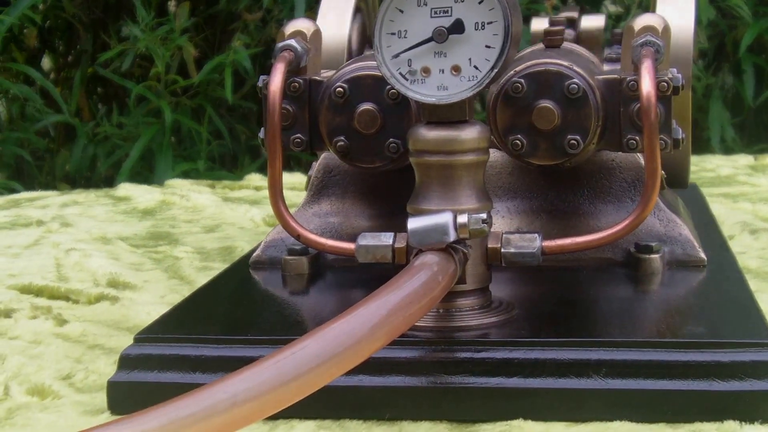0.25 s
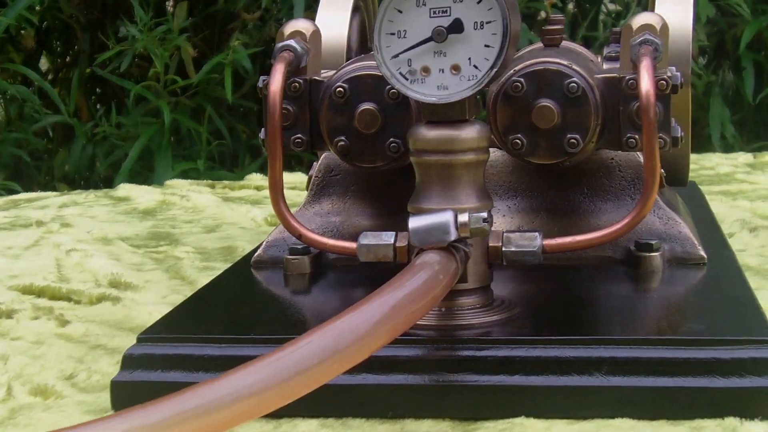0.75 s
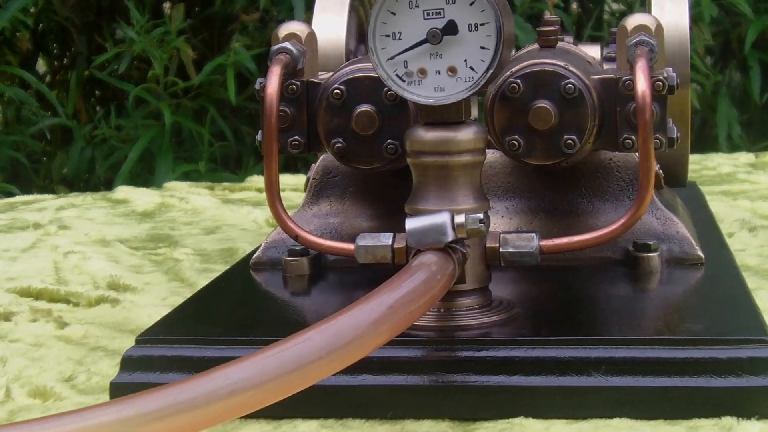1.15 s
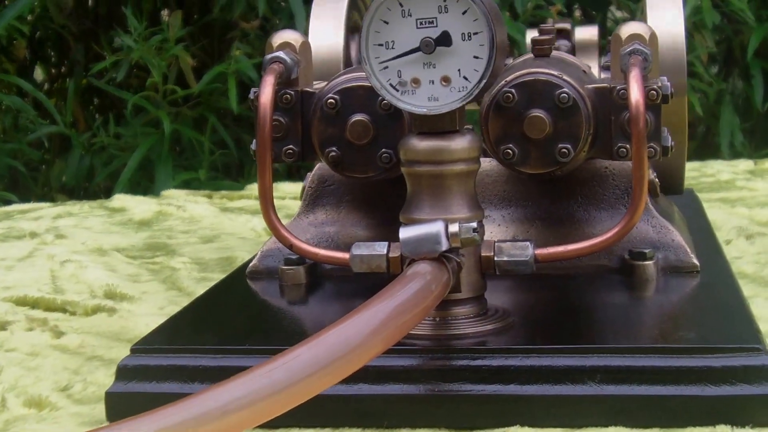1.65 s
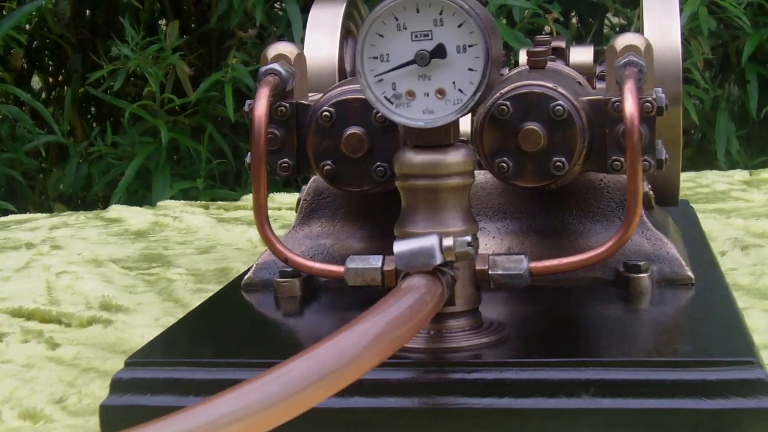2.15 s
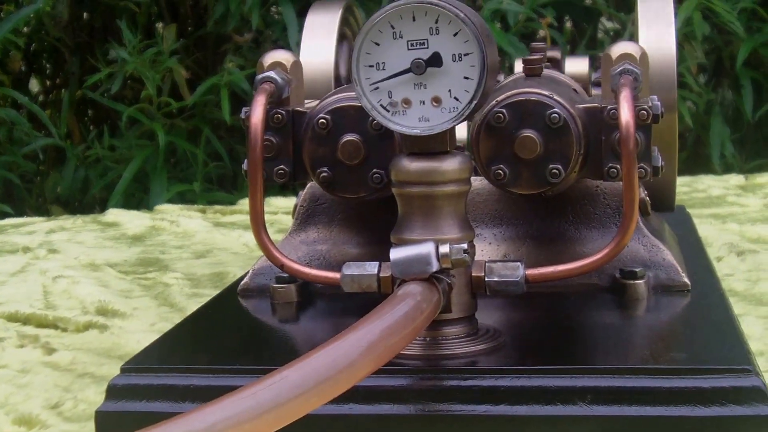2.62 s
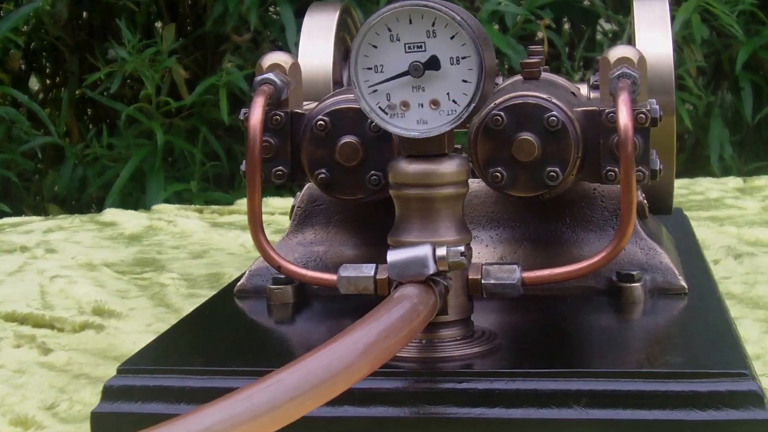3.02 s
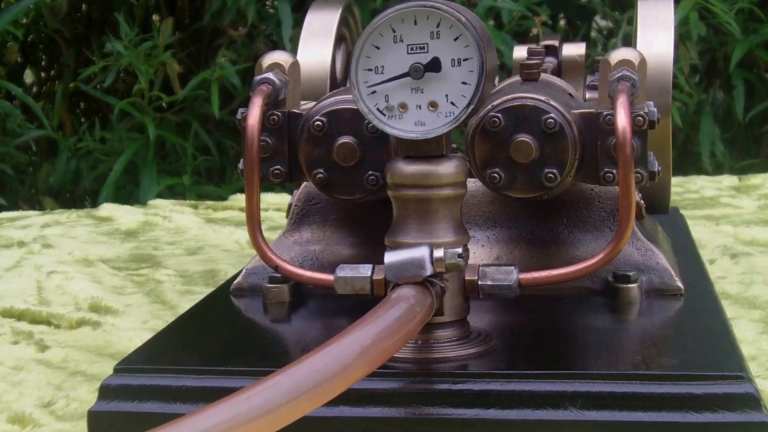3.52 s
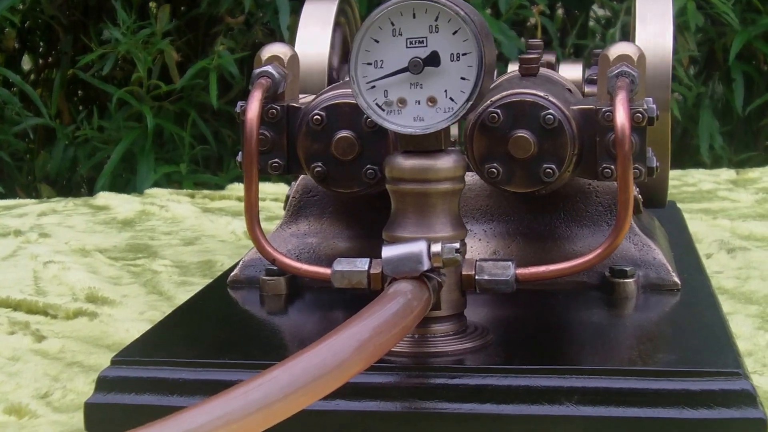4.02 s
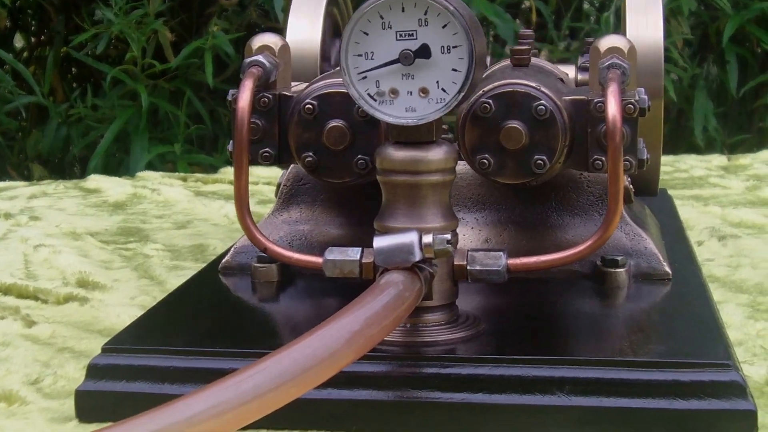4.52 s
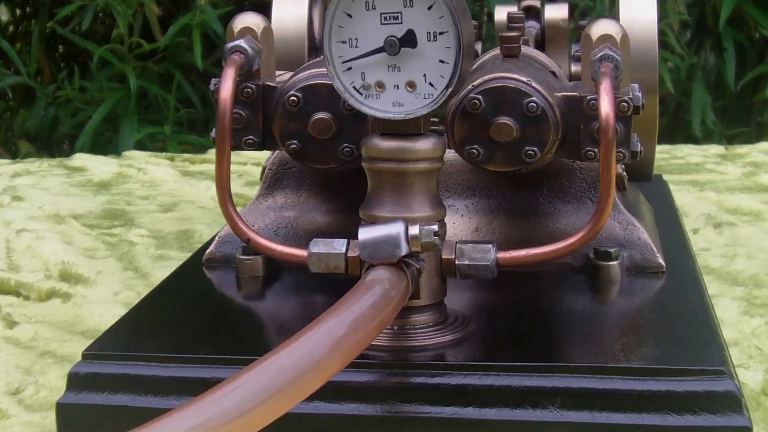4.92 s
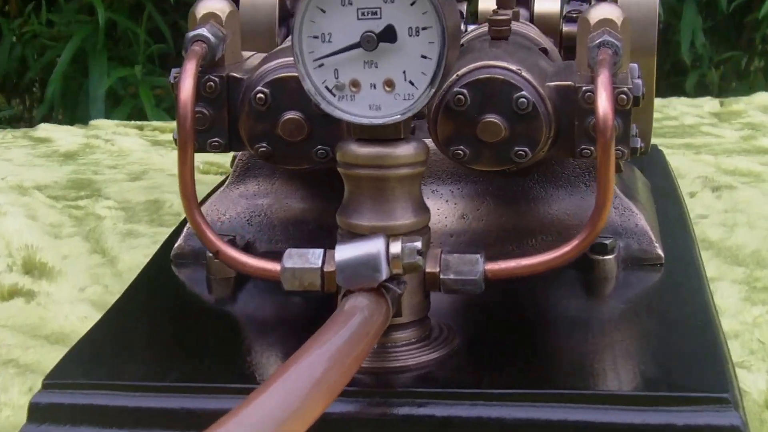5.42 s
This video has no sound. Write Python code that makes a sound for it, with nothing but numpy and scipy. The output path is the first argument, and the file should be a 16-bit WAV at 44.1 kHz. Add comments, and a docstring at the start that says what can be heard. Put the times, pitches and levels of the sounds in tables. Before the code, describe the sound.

A small twin-cylinder model steam engine is heard very close, dry and centred, already running at the start. From 0 to 1.4 seconds it makes about 4.7 turns a second, each turn carrying three short, slightly different metallic knocks with a brief scrape and quickly fading ring. Bright airy steam hiss runs throughout, swelling gently in five uneven puffs per turn, so it flutters. Gritty sliding friction fills the midrange and makes the casting ring. Around 1.44 seconds the throttle opens: the steam rush jumps up and the beat accelerates sharply, nearing 6.4 turns a second by 2.2 seconds. The extra surge eases near 1.85 seconds. From there to about 5.7 seconds the rapid clatter stays regular, while the steam rush creeps slightly louder. A faint pump buzz, mostly around 600 to 1100 hertz, holds a steady pitch over barely audible low tones. It ends still running.

```python
"""Small steam engine speeding up

A small twin-cylinder model steam engine runs close by; its throttle opens near 1.44 s and it speeds up.
Three loose joints each knock once per turn: a brief scrape and a burst of fading sine waves.
Steam is shaped noise that hisses throughout and swells in five exhaust puffs per turn.
Sliding parts add grainy friction noise and set the casting ringing with it.
A small pump buzzes at its own nearly steady speed, as a stack of sine waves, over two faint low tones."""
import sys
import numpy as np
from scipy.fft import rfft, irfft, next_fast_len
from scipy.io import wavfile
from scipy.ndimage import map_coordinates

SR = 44100
rng = np.random.default_rng(int(sys.argv[2]) if len(sys.argv) > 2 else 0)


def store_wav(level_fs):
    """Save 16-bit WAV to argv[1]."""
    pcm = np.round(np.clip(np.atleast_2d(level_fs), -1, 1) * 32767)
    wavfile.write(sys.argv[1], SR, pcm.T.astype(np.int16))


N = 250045
TIME = np.arange(N) / SR  # seconds


def amp(db):
    """Turn decibels into a plain multiplier."""
    return 10 ** (np.asarray(db) / 20)


def unit(x):
    """Scale x to an rms level of 1."""
    return x / np.sqrt(np.mean(x ** 2) + 1e-20)


def wobble(rate):
    """A smooth random curve through `rate` random points per second."""
    points = rng.standard_normal(int(N * rate / SR) + 4)
    return map_coordinates(points, [np.arange(N) * rate / SR])


def filtered(x, response):
    """Multiply each frequency in x by response(frequency in Hz)."""
    size = next_fast_len(N + SR // 4)  # spare room keeps the end from wrapping onto the start
    spectrum = rfft(x, size) * response(np.fft.rfftfreq(size, 1 / SR))
    return irfft(spectrum, size)[:N]


def coloured_noise(spectrum):
    """White noise given a tone colour, at rms 1."""
    return coloured(rng.standard_normal(N), spectrum)


def coloured(x, spectrum):
    """Shape x along a line through (f/Hz, level/dB) points, at rms 1."""
    f, db = np.transpose(spectrum)
    return unit(filtered(x, lambda hz: amp(np.interp(np.log(hz + 1), np.log(f), db))))


def shaft():
    """The shaft gathers speed as steam is let in: turns made so far, and drive from 0 (slow) to 1 (fast)."""
    # shaft speed over time: t/s, speed/(turns per s)
    speed_points = [(0, 4.6867), (1.461, 4.6577), (1.531, 5.6587), (1.765, 6.2601), (2.255, 6.4468),
                    (3, 6.4564), (5.67, 6.4135)]
    slow, fast = 4.67, 6.44  # turns per second
    times, speeds = np.transpose(speed_points)
    speed = np.interp(TIME, times, speeds)
    turns = np.cumsum(speed) / SR
    drive = np.clip((speed - slow) / (fast - slow), 0, 1)
    return turns, drive


def once_per_turn(turns, drive, place, slow_db, fast_db, uneven_db):
    """A joint takes up its play at one place in each turn: rows of t/s, force/dB, with a little chance."""
    # place holds the part of a turn (0-1) at low and at high speed
    passes = np.floor(turns - np.interp(drive, [0, 1], place))
    at = np.flatnonzero(np.diff(passes) > 0)
    force_db = slow_db + drive[at] * (fast_db - slow_db) + uneven_db * rng.standard_normal(len(at))
    return np.column_stack([at / SR, force_db])


def joint(knocks, modes, drive, gain_db, rise_s, scrape_db, scrape_s):
    """An oiled joint closes softly, scrapes for a moment and rings much alike on every turn."""
    # colour of metal rubbing on oiled metal: f/Hz, relative level/dB per Hz
    scrape_colour = [(300, -31), (750, -1), (1000, 2), (1550, -2), (2300, 3), (2900, -5), (4000, -5.5),
                     (7000, -15), (14000, -36)]
    alike = 0.82  # share of the scrape's power that repeats on every turn
    scatter_db, detune = 0.2, 0.003  # chance spread of each mode's level, and of its pitch as a fraction
    low_hz = 620
    hz, t60, slow_db, fast_db = np.transpose(modes)[:, :, None]

    lead = SR // 100  # samples before contact
    t = np.arange(-lead, SR // 16) / SR
    age = np.maximum(t, 0)
    start_phase = rng.uniform(0, 2 * np.pi, hz.shape)
    # heavy low modes take longer to build up than light high ones
    mode_rise = rise_s * (hz.mean() / hz) ** 0.22
    swell = 1 - np.exp(-(age / mode_rise) ** 2)
    # the surfaces rub just before and after they meet
    contact = 1 / np.cosh(np.clip((t - .001) / scrape_s, -20, 20))
    rubbing = coloured_noise(scrape_colour)
    grain, *fresh_grains = rubbing[:N - N % len(t)].reshape(-1, len(t))

    out = np.zeros(N + SR)
    for (seconds, force_db), fresh in zip(knocks, fresh_grains):
        at = max(round(seconds * SR), 0)
        size, pitch, slip = rng.standard_normal((3, *hz.shape))
        level_db = slow_db + drive[at] * (fast_db - slow_db) + scatter_db * size
        fade = amp(level_db - 60 * age / t60)
        phase = 2 * np.pi * hz * (1 + detune * pitch) * age + start_phase + slip / 2
        ring = (swell * fade * np.sin(phase)).sum(0)
        # the same worn spot passes on every turn, pressed harder at speed
        rub = np.sqrt(alike) * grain + np.sqrt(1 - alike) * fresh
        scrape = amp(scrape_db + 3.1 * drive[at]) * contact * rub
        out[at:at + len(t)] += amp(force_db) * (amp(gain_db) * ring + scrape)
    # such small parts radiate almost no bass
    return filtered(out[lead:lead + N], lambda f: f ** 6 / (f ** 6 + low_hz ** 6))


def joints(turns, drive):
    """Crosshead, crank and bearing each knock at their own place, a little later in the turn at speed."""
    # what each joint rings with: f/Hz, 60 dB fade time/s, relative level/dB at low speed, same at high speed
    crosshead_modes = [(760, 0.0076, -38, -19), (1058, 0.016, -13, -12), (1310, 0.021, -27, -29),
                       (1614, 0.023, -23, -24.5), (2042, 0.056, -29, -19.5), (2370, 0.036, -24, -49),
                       (2530, 0.0095, -19, -35), (3800, 0.0071, -12, -35), (4580, 0.02, -28, -24)]
    crank_modes = [(788, 0.039, -22, -17), (1033, 0.017, -38, -19), (1350, 0.0069, -37, -17.5),
                   (1842, 0.012, -6.5, -20), (2025, 0.06, -22.5, -46), (2230, 0.032, -20.5, -18.5),
                   (2580, 0.023, -30, -22), (2943, 0.021, -24, -10.5), (3710, 0.0097, -17, -13.5),
                   (4590, 0.0075, -33, -14.5), (4930, 0.021, -28, -26), (5400, 0.027, -31, -26.5)]
    bearing_modes = [(915, 0.029, -15, -10), (1013, 0.049, -38, -38), (1230, 0.018, -12.5, -20.5),
                     (1357, 0.043, -27, -27), (1690, 0.014, -17, -32), (2089, 0.084, -34, -23.5),
                     (2290, 0.029, -24, -20), (2518, 0.027, -15, -15), (2980, 0.027, -20, -27),
                     (3440, 0.0096, -13, -37), (3787, 0.02, -23, -20)]
    crosshead_knocks = once_per_turn(turns, drive, (.0344, .0609), slow_db=4.0, fast_db=1.9, uneven_db=0.7)
    crank_knocks = once_per_turn(turns, drive, (.2809, .296), slow_db=-3.1, fast_db=0.87, uneven_db=0.4)
    bearing_knocks = once_per_turn(turns, drive, (.5558, .585), slow_db=-0.2, fast_db=-0.6, uneven_db=0.5)
    crosshead = joint(crosshead_knocks, crosshead_modes, drive,
                      gain_db=-2, rise_s=0.0015, scrape_db=-40.0, scrape_s=0.0037)
    crank = joint(crank_knocks, crank_modes, drive,
                  gain_db=-1.46, rise_s=0.0011, scrape_db=-30.0, scrape_s=0.0053)
    bearing = joint(bearing_knocks, bearing_modes, drive,
                    gain_db=-0.57, rise_s=0.0015, scrape_db=-31.5, scrape_s=0.0058)
    return crosshead + crank + bearing


def exhaust(turns):
    """Steam flow rises, in dB, as the ports open one after another in each turn."""
    # exhaust openings: place in the turn/(0-1), width/turns, basic rise/dB
    openings = [(.045, 0.065, 1.5), (.295, 0.058, 1), (.385, 0.041, 0.45), (.525, 0.055, 2.5),
                (.875, 0.048, 1.67)]
    rise_db = np.zeros(N)
    for place, width, db in openings:
        distance = (turns - place + .5) % 1 - .5  # turns from the middle of the opening
        rise_db += db * np.exp(-(distance / width) ** 2)
    return rise_db


def flow(throttled_db, open_db, surge_db, creep_db_per_s):
    """Steam noise steps up with the throttle and surges while the flywheel gathers speed, then creeps up."""
    throttle_s, opening_s = 1.444, 0.052  # middle and length of the throttle's move
    surge_end_s, surge_fade_s = 1.85, 0.11  # middle and length of the surge's fade
    opened = np.clip((TIME - throttle_s) / opening_s + .5, 0, 1)
    surge = opened * np.clip((surge_end_s - TIME) / surge_fade_s + .5, 0, 1)
    creep_db = creep_db_per_s * np.maximum(TIME - surge_end_s, 0)
    return throttled_db + open_db * opened + surge_db * surge + creep_db


def steam(puff_db):
    """Leaks hiss and steam rushes through the throttle; every exhaust opening swells both into a puff."""
    # colours of the leak hiss and the throttle rush: f/Hz, relative level/dB per Hz
    hiss_colour = [(2500, -58), (5000, -12.5), (6300, -4), (7500, -2.5), (9400, 0), (10500, -1.5),
                   (11500, -4.5), (12600, -4), (14000, -6.5), (15300, -12)]
    rush_colour = [(60, -58), (300, -18.5), (1200, -7.5), (3200, -4), (4200, -2), (4650, 0), (5200, -2),
                   (6000, -1.5), (8000, -20), (15000, -33)]
    # how they follow the steam: basic level/dB, rise when open/dB, surge/dB, creep/(dB per s)
    hiss_flow = (-25, 1.72, 0.7, 0.25)
    rush_flow = (-34.4, 4, 4, 1.08)
    hiss_db = flow(*hiss_flow) - 2.5 + puff_db + 0.26 * wobble(24.8)
    rush_db = flow(*rush_flow) - 4 + 1.12 * puff_db + 1.06 * wobble(30.83)
    return amp(hiss_db) * coloured_noise(hiss_colour) + amp(rush_db) * coloured_noise(rush_colour)


def sliding(puff_db, drive):
    """Pistons and valve rods rub in fine uneven grains that set the casting ringing, harder in each puff."""
    # colour of the sliding friction: f/Hz, relative level/dB per Hz
    friction_colour = [(30, -68), (70, -53), (120, -42), (200, -26.5), (330, -12.5), (450, -14),
                       (560, -6.5), (720, -6), (1100, 0), (1600, -2.5), (2600, -2.5), (3200, -0.5),
                       (3600, -3), (4200, -17)]
    # casting resonances: f/Hz, width/Hz, relative level/dB
    resonances = [(764, 140, -19), (915, 140, 3.5), (2077, 70, -4), (2260, 61, -0.5), (3060, 130, -3)]
    # how the churn follows the steam: basic level/dB, rise when open/dB, surge/dB, creep/(dB per s)
    churn_flow = (-27.5, 1.0, 0.9, 0.03)

    def casting(f):
        """Each resonance passes a narrow band around its own pitch."""
        return sum(amp(db) * 1j * f * width / (centre ** 2 - f ** 2 + 1j * f * width)
                   for centre, width, db in resonances)

    # random loudness wobbles make the friction grainy
    friction = rng.standard_normal(N) * amp(wobble(260))
    rubbing = rng.standard_normal(N) * amp(wobble(120))
    ring = unit(filtered(rubbing, casting))
    churn_db = flow(*churn_flow) + 0.93 * puff_db
    ring_db = -12.5 + 3 * drive
    return amp(churn_db) * (amp(-5.0) * coloured(friction, friction_colour) + amp(ring_db) * ring)


def pump():
    """A small pump hums in harmonics of its stroke, each wavering in level while the speed barely sways."""
    # harmonics: multiple of the pump's speed, rms level/dB before wavering
    harmonics = [(2, -76), (4, -71.5), (5, -58), (6, -61), (7, -58.5), (8, -55), (9, -63.5), (10, -59.5),
                 (12, -58.5), (13, -50.5), (15, -47.5), (16, -46), (20, -48.5), (22, -50.5), (23, -63.5)]
    speed_hz = 46.48
    strokes = speed_hz * TIME + 0.0092 * wobble(1.94)
    buzz = np.zeros(N)
    for multiple, db in harmonics:
        level = amp(db + 1.45 * wobble(4.96))
        buzz += level * np.sin(2 * np.pi * (round(multiple) * strokes + rng.random()))
    return np.sqrt(2) * buzz  # a sine's peak is root 2 times its rms


def hum():
    """Two faint low tones waver in level and phase under everything."""
    # tones: f/Hz, rms level/dB before wavering
    tones = [(77, -98), (154, -78.5)]
    total = np.zeros(N)
    for hz, db in tones:
        total += amp(db + 3.2 * wobble(1.8)) * np.sin(2 * np.pi * hz * TIME + wobble(2.7))
    return np.sqrt(2) * total


def scene():
    """One shaft times the knocks and puffs; every sound sits in the middle, equal in both channels."""
    turns, drive = shaft()
    puff_db = exhaust(turns)
    engine = joints(turns, drive) + steam(puff_db) + sliding(puff_db, drive)
    mono = engine + pump() + hum()
    return np.array([mono, mono])


def record(dry):
    """Cut one narrow notch in the treble and everything from the top limit upward."""
    notch_hz, notch_width_hz, top_hz = 7850, 95, 15330

    def response(hz):
        """Zero at the notch's centre, and zero from the top limit up."""
        off_centre = (hz - notch_hz) ** 2
        return off_centre / (off_centre + (notch_width_hz / 2) ** 2) * (hz < top_hz)

    return np.array([filtered(side, response) for side in dry])


dry = scene()
out = record(dry)
store_wav(out)
```